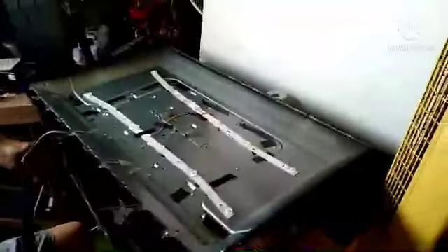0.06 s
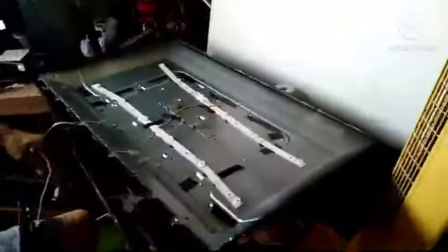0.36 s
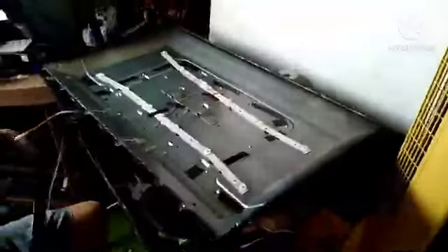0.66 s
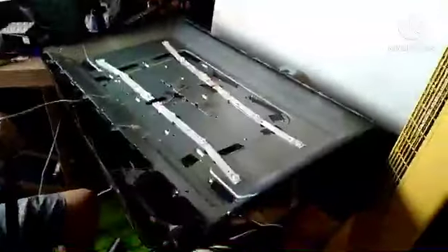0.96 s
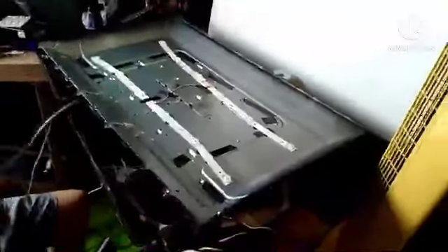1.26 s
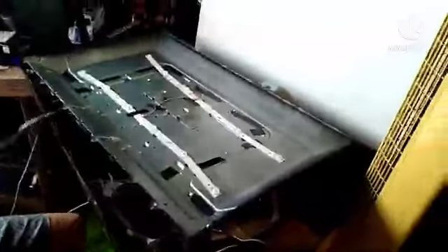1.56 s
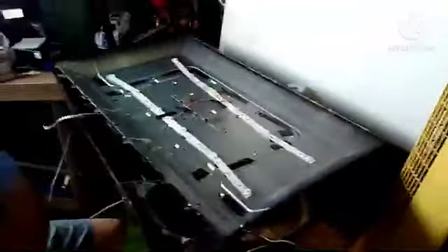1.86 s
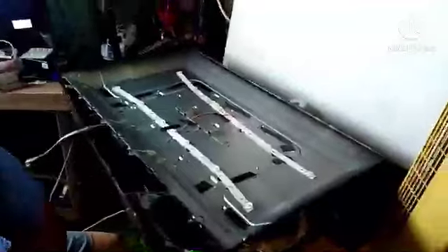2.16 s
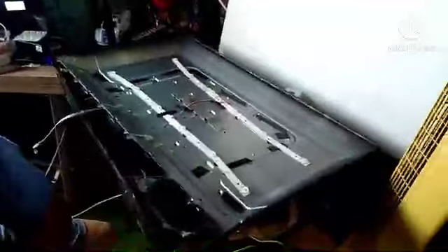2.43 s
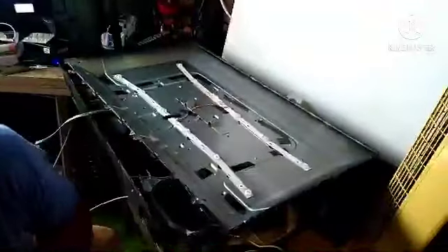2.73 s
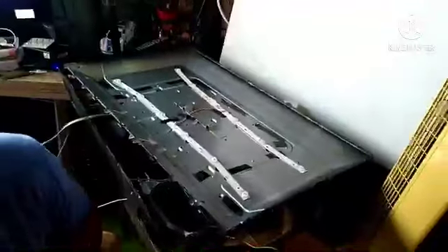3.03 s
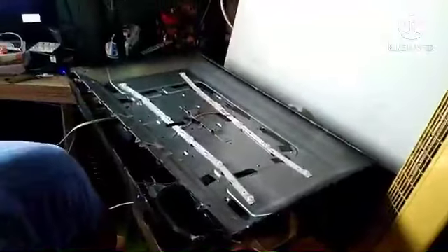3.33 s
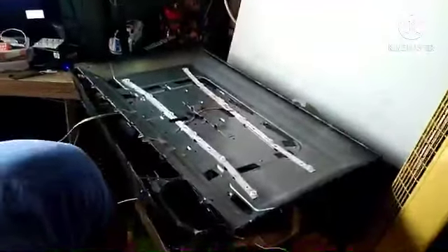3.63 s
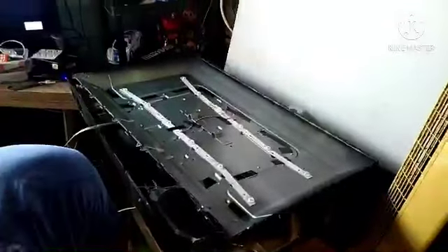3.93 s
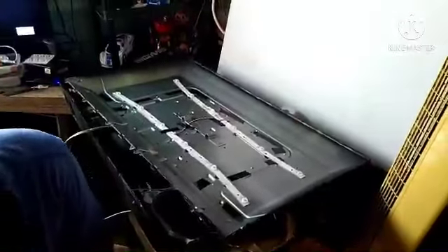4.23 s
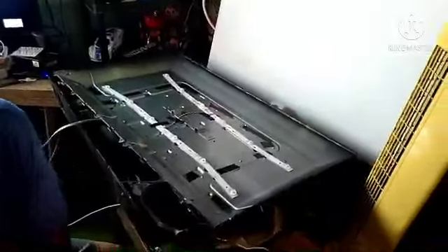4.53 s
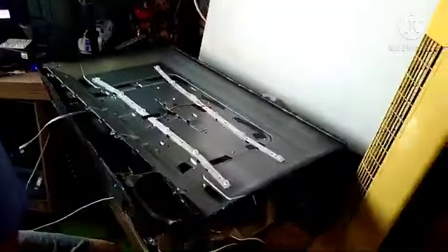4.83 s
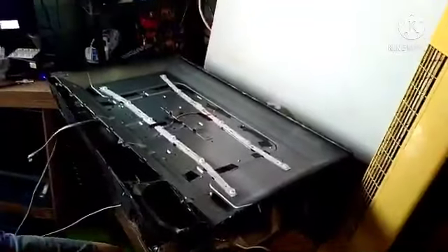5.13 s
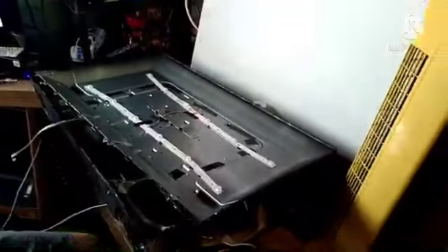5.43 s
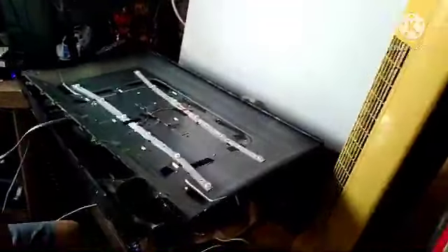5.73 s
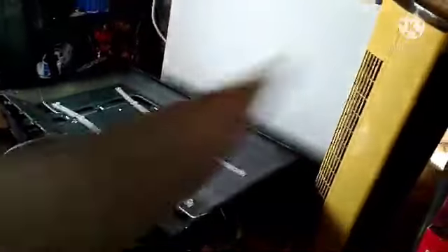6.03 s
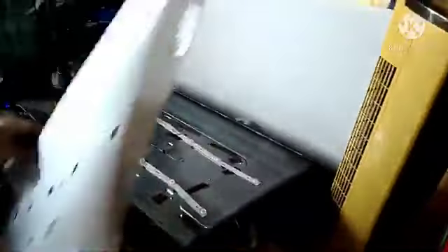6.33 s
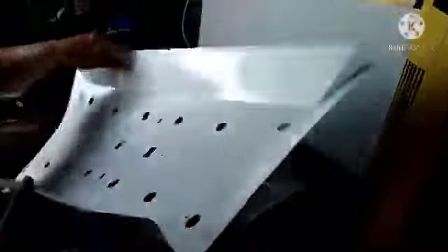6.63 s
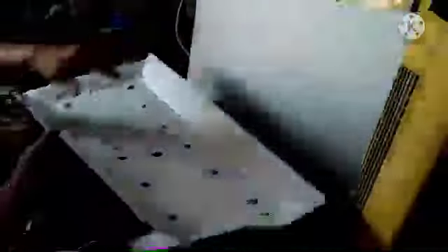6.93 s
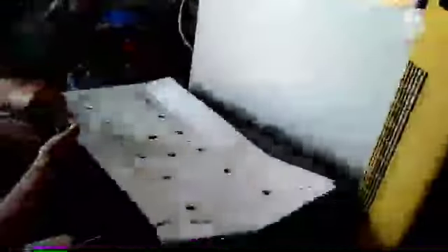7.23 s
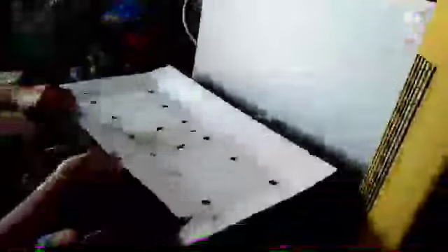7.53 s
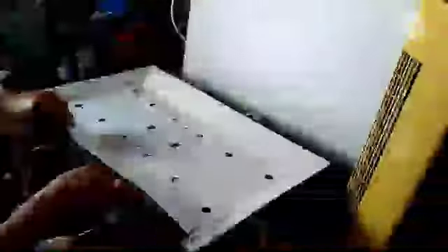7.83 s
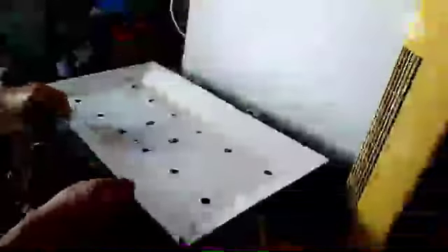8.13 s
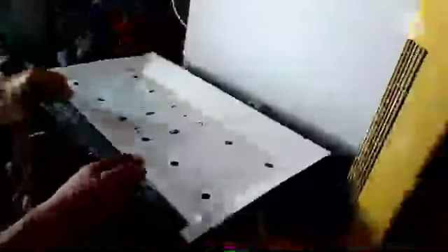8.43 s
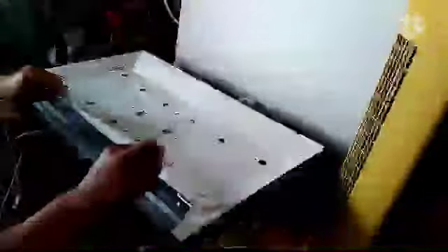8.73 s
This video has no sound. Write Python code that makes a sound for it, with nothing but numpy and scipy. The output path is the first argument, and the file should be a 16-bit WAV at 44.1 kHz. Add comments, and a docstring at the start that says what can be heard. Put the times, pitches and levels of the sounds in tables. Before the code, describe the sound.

Over a faint hiss in a small workshop, fingers fiddle with loose parts on a metal tray: tiny ticks, faint brushing and light clicks, with a sharp knock at 2 seconds. From about 3.6 seconds a thin plastic sheet is dragged out with uneven, hollow rubbing, giving a few snaps around 4.5 and 5.1 seconds. Near 5.6 seconds it buckles with the loudest snaps, then crackles, rustles and flaps softly as it swings, until about 6.8 seconds, with one very brief high squeak near 6.1 seconds. From 6.8 seconds to the end, near 9 seconds, its edge scrapes along the tray in short, quieter shoves, catching and letting go with small clicks. The room answers each contact with a short echo, and the quiet sounds are thinned, as if by noise reduction.

```python
"""A thin plastic sheet is picked up, swung over an open metal panel tray and slid into place.
First, fingers fiddle with loose parts: light clicks, a knock at 2 s. From 3.6 s the sheet is dragged
out in stick-slip. Near 5.6 s it buckles with loud snaps, then crackles, flaps and squeaks once as it
swings. From 6.8 s its edge scrapes and catches along the tray in short shoves. Throughout, the small
workshop answers shortly and a noise suppressor thins the quiet sounds."""
import sys
import numpy as np
from scipy import signal
from scipy.fft import rfft, irfft, next_fast_len
from scipy.io import wavfile
from scipy.ndimage import uniform_filter1d, map_coordinates

SR = 44100
rng = np.random.default_rng(int(sys.argv[2]) if len(sys.argv) > 2 else 0)


def file_out(sig):
    """Save sig as 16-bit WAV at sys.argv[1]."""
    # one column per channel
    cols = np.atleast_2d(sig).T
    # limit, then scale
    lim = np.clip(cols, -1, 1)
    pcm = np.round(lim * 32767).astype(np.int16)
    wavfile.write(sys.argv[1], SR, pcm)


N = 391608

# Workshop decay: freq_hz, t60_s
ROOM_DECAY = [(100, 0.81), (260, 0.61), (700, 0.23), (1800, 0.23), (4800, 0.24), (12800, 0.24)]
# Spectra of background, moved air, friction and blows: freq_hz, density_db
HISS_SPECTRUM = [(20, 0), (58, 13), (90, -3), (125, 11), (170, -1.5), (380, 3.5), (700, -6.5), (1200, 2.5),
                 (2700, -0.5), (4200, -22), (8500, -18), (9700, -5.5), (11000, -12), (15500, -36.5)]
FLAP_SPECTRUM = [(40, -29), (85, -9), (125, -1), (200, 5), (300, 3.5), (500, -10.5), (1000, -59)]
SCRAPE_SPECTRUM = [(350, -88.5), (700, -23), (1000, -10.5), (1400, 0.5), (1800, -3), (2200, 2.5),
                   (2650, 4.5), (3200, -3), (4000, -10.5), (5200, -29.5), (9000, -62.5)]
HOLLOW_SPECTRUM = [(60, -45.5), (130, -25), (250, -7.5), (400, 6), (550, 7), (750, 5.5), (1100, 1.5),
                   (2000, -51)]
FIZZ_SPECTRUM = [(2500, -10.5), (4300, -5), (5700, -2.5), (7500, 2.5), (9200, 2.5), (11000, -6),
                 (15500, -13)]
CLACK_SPECTRUM = [(250, -57), (550, -23), (950, -2), (1350, -0.5), (1800, -1.5), (2700, 0), (3500, -11.5),
                  (4600, -22.5), (6500, -49.5), (10000, -79)]
CRACK_SPECTRUM = [(1500, -49.5), (3000, 9), (4000, 4), (5700, -7), (7800, 0.5), (10500, -6), (13000, -16),
                  (15500, -13.5)]
THUMP_SPECTRUM = [(50, -61.5), (100, -20), (135, -17), (185, 0.5), (260, -5.5), (480, -1), (700, 3),
                  (1100, -19), (2000, -70.5)]
# Scrape of the sheet lying flat, re its edge: freq_hz, gain_db
FLAT_FILTER = [(700, -6), (1100, 13.5), (1800, 7), (2600, -14), (4000, -3)]
# Resonances of a brushed metal part and of a light touch: centre_hz, width_hz, gain_db
BRUSH_PEAKS = [(4540, 310, 1), (5900, 270, -5), (7500, 2000, -14)]
TOUCH_PEAKS = [(1412, 144, -2), (2588, 113, -4)]
# Thin hiss near 9 kHz in quiet rubbing, as the noise suppressor leaves it: centre_hz, width_hz, gain_db
THIN_HISS_BANDS = [(9300, 640, 4.5), (11500, 4000, -16), (14800, 1800, -19)]
# High and low modes of the struck sheet and tray: freq_hz, gain_db, base_t60_s
RING_MODES = [(945, -15, 0.26), (983, -4, 0.21), (1317, 13.5, 0.27), (1485, -1, 0.4), (1496, 8.5, 0.19),
              (2210, -18, 0.31), (2210, -9, 0.23), (2410, 10, 0.19), (2564, 2, 0.1), (3576, -18, 0.2)]
BODY_MODES = [(183, -2, .2), (245, -3, .15), (285, 0, .26), (470, -4, .1), (790, 0, .18)]

# Soft bumps, groans and faint squeaks of shifted things: centre_s, pitch_hz, level_db
SOFT_BUMPS = [(0.373, 1023, -64), (.405, 2705, -59.5), (.59, 2860, -61.5), (.735, 415, -66.5),
              (1.069, 2623, -61.5), (1.391, 1340, -52), (1.524, 1085, -51), (1.563, 457, -59),
              (1.733, 1118, -54), (1.455, 2160, -57.5), (2.794, 1342, -57.5), (2.529, 2600, -58),
              (2.79, 2640, -56), (3.324, 256, -57), (3.631, 604, -53.5), (3.704, 537, -51.5),
              (3.776, 550, -50.5), (3.873, 621, -46.5), (3.92, 540, -44.5), (3.99, 558, -38),
              (4.901, 388, -56), (5.11, 384, -45), (5.197, 334, -55), (6.805, 300, -56), (7.7, 721, -50.5),
              (8.361, 420, -54.5), (8.711, 248, -54.5)]
# A metal part is brushed: start_s, gain_db
BRUSH_STROKES = [(.458, -54.5), (1.23, -75.5), (2.33, -63.5), (2.82, -60.5)]
# The swinging sheet flaps: time_s, level_db
FLAP_LEVELS = [(5.6, -87), (5.8, -51), (6.1, -49), (6.3, -55.5), (6.5, -55.5), (6.8, -67.5), (7.3, -65),
               (7.6, -88)]
# Fingers fiddle with the parts: time_s, scrape_db
FIDDLE_LEVELS = [(0, -86), (.4, -67.5), (.9, -77), (1.6, -59.5), (2.4, -68), (2.6, -65), (3.5, -64),
                 (5.3, -59), (5.45, -72.5), (7, -59), (8.8, -56.5)]
# The sheet is dragged out, then swung: time_s, scrape_db, hollow_db, fizz_db
DRAG_LEVELS = [(3.6, -77, -68.5, -68), (3.622, -62, -56.5, -77), (3.69, -62.5, -66, -87),
               (3.974, -47, -48, -64.5), (3.99, -36, -34.5, -63), (4.094, -46, -48.5, -58.5),
               (4.132, -39, -33, -63.5), (4.242, -43.5, -48.5, -58), (4.288, -36.5, -40.5, -53),
               (4.39, -39, -47.5, -57), (4.468, -28, -32, -57), (4.52, -44, -42, -76),
               (4.532, -39, -33.5, -62), (4.562, -44.5, -40.5, -68), (4.632, -46, -52.5, -65.5),
               (4.76, -55, -58, -79)]
SWING_LEVELS = [(5.8, -39, -49, -70), (5.87, -36, -39.5, -73), (6.016, -42, -45, -64.5),
                (6.066, -45.5, -46, -63), (6.176, -34.5, -41.5, -65), (6.248, -48.5, -54.5, -59.5),
                (6.412, -46, -70, -70), (6.57, -47, -55, -61), (6.74, -55.5, -67, -68),
                (6.914, -44.5, -56, -81.5), (7.08, -71, -68, -81)]
# Offsets on those two moves: scrape_db, hollow_db, fizz_db
DRAG_OFFSETS = [-2.5, -0.5, 0.5]
SWING_OFFSETS = [-4, 1.5, -2]
# Shoves along the tray: start_s, length_s, scrape_db, hollow_re_scrape_db, fizz_re_scrape_db
TRAY_SHOVES = [(1.458, 0.092, -52.5, -31, -17), (1.728, 0.065, -61.5, -2.5, -7),
               (2.1, 0.18, -54, -9.5, -15), (2.758, 0.08, -61, -36, -32), (2.97, 0.14, -62, -22, -14.5),
               (5.088, 0.27, -63, -1, -37.5), (6.35, 0.11, -53, 2, -14), (6.76, 0.18, -59, 10.5, -19),
               (6.888, 0.025, -41, -21, -19.5), (7.108, 0.031, -41.5, -6.5, -13),
               (7.186, 0.052, -32, -11.5, -19.5), (7.239, 0.074, -38, -6.5, -20),
               (7.328, 0.29, -45, -12.5, -13.5), (7.398, 0.028, -40, -16, -21),
               (7.668, 0.036, -44.5, -6, -10.5), (7.753, 0.081, -39.5, -7.5, -19.5),
               (7.858, 0.072, -48, -13, -15), (7.978, 0.091, -55, -18, -15.5), (8.09, 0.061, -47, -35, -17),
               (8.278, 0.16, -49, -32.5, -13), (8.468, 0.11, -50, -12.5, -18),
               (8.688, 0.064, -45, -9.5, -32), (8.818, 0.041, -38, -24, -19)]
# Loose parts click on the tray: start_s, clack_db, brightness_hz, crack_db
PART_CLICKS = [(1.065, -56, 2620, -74), (1.38, -42.5, 1380, -63), (1.3998, -56, 1400, -54),
               (1.4428, -36, 1370, -52.5), (1.5064, -43.5, 1120, -55), (1.7092, -37, 2130, -63),
               (1.7324, -40, 2800, -57), (1.9971, -24.5, 1600, -44.5), (2.2208, -42, 2340, -64),
               (2.741, -52, 2580, -71.5), (3.7683, -38.5, 710, -57.5), (3.8549, -30.5, 920, -50),
               (4.8, -39.5, 2400, -56.5), (4.878, -41, 2580, -71), (4.919, -37.5, 2800, -59.5)]
# Dull knocks on the tray: start_s, clack_db, brightness_hz, thump_db
TRAY_KNOCKS = [(1.1355, -42, 550, -44.5), (1.152, -41.5, 550, -52), (2.0383, -12, 950, -30),
               (2.0564, -39.5, 720, -45), (2.1942, -29.5, 740, -42), (3.6203, -42.5, 590, -56.5),
               (4.6038, -49, 680, -44), (4.7239, -36.5, 1060, -49.5), (5.0866, -23.5, 1900, -41.5),
               (6.3257, -29.5, 1340, -40.5)]
# Tiny bright ticks: start_s, crack_db
BRIGHT_TICKS = [(.192, -44), (0.215, -53), (0.2377, -53), (.378, -63), (.96, -70), (1.9, -63.5),
                (6.6676, -51), (8.1597, -55), (8.285, -55.5), (8.317, -69), (8.8235, -42)]
# The sliding edge catches and lets go: start_s, clack_db
EDGE_CATCHES = [(3.909, -27), (6.906, -27.5), (7.1212, -30.5), (7.1836, -24.5), (7.195, -21.5),
                (7.414, -25.5), (7.5614, -30), (7.6773, -31), (7.7316, -25.5), (7.8039, -29),
                (8.0746, -32.5), (8.3977, -31.5), (8.5112, -32), (8.6846, -32), (8.8212, -25)]
# The sheet buckles or slaps the tray: start_s, clack_db, brightness_hz, crack_db, clack_t60_s
SHEET_SNAPS = [(3.9894, -25, 1370, -53, 0.1), (4.4297, -19, 1480, -50, 0.13), (4.468, -15, 1220, -67, 0.11),
               (4.53, -18, 1500, -53, .09), (5.0983, -19, 940, -44, 0.05),
               (5.1541, -18.5, 1190, -47.5, 0.073), (5.222, -30, 1540, -61, 0.059),
               (5.2385, -26.5, 1130, -66.5, 0.086), (5.5484, -4, 1510, -31.5, 0.12),
               (5.6123, -3, 1130, -21.5, .18), (5.6428, -11, 1270, -51, 0.083),
               (5.6673, -16, 1220, -44, .065), (5.7781, -15.5, 1380, -48.5, 0.11),
               (5.8045, -11.5, 970, -35, 0.069), (5.8763, -14, 2280, -38.5, 0.14),
               (5.947, -13.5, 1920, -44.5, 0.12), (6.0196, -24, 1330, -39.5, 0.18),
               (6.061, -16.5, 2350, -59, .05), (6.092, -16, 1220, -48.5, 0.057),
               (6.1713, -18.5, 1310, -49.5, 0.13), (6.4317, -11, 1400, -49, 0.074),
               (6.5262, -16.5, 1350, -61.5, .1), (6.742, -25, 1250, -58, 0.062)]


def amp(db):
    return 10 ** (np.asarray(db) / 20)


def unit_rms(x):
    return x / np.sqrt(np.mean(x ** 2) + 1e-20)


def log_interp(points, hz):
    """Curve through (freq_hz, value) points on a log axis."""
    knots_hz, values = np.transpose(points)
    return np.interp(np.log(hz + 1), np.log(knots_hz + 1), values)


def fade(t, t60_s):
    """Exponential decay, 60 dB in t60_s."""
    return np.exp(-np.log(1000) * t / np.maximum(t60_s, 1e-3))


def wobble(knots_per_s):
    """Smooth random curve."""
    knots = rng.standard_normal(int(N * knots_per_s / SR) + 4)
    return map_coordinates(knots, [np.arange(N) * knots_per_s / SR])


def add(track, start_s, sound):
    part = track[round(start_s * SR):][:len(sound)]
    part += sound[:len(part)]


def filtered(x, response):
    """x through a gain given as a function of Hz."""
    size = next_fast_len(len(x) + 4096)
    return irfft(rfft(x, size) * response(np.fft.rfftfreq(size, 1 / SR)), size)[:len(x)]


def coloured(x, spectrum):
    """x shaped by a spectrum, at rms 1."""
    return unit_rms(filtered(x, lambda hz: amp(log_interp(spectrum, hz))))


def bandpassed(x, bands):
    """x through steep-sided bands, at rms 1."""
    def response(hz):
        return sum(amp(db) * (1j * hz * width_hz / (centre_hz ** 2 - hz ** 2 + 1j * hz * width_hz)) ** 2
                   for centre_hz, width_hz, db in bands)
    return unit_rms(filtered(x, response))


def hiss(level_db=-66):
    """Faint steady background."""
    return amp(level_db) * coloured(rng.standard_normal(N), HISS_SPECTRUM)


def room(x, rise_s=0.0011, segments=24):
    """Workshop reverb; crossfaded tails change its fine pattern as the sheet moves about."""
    out, hop = np.zeros(N), N / segments
    for k in range(segments + 1):
        hz, t, noise = signal.stft(rng.standard_normal(SR // 2), SR, nperseg=256)
        decay = fade(t, log_interp(ROOM_DECAY, hz)[:, None])
        tail = signal.istft(noise * decay, SR, nperseg=256)[1]
        tail *= 1 - np.exp(-(np.arange(len(tail)) / SR / rise_s) ** 2)
        span = np.arange(max(0, int((k - 1) * hop)), min(N, int((k + 1) * hop)))
        piece = x[span] * np.cos(np.pi / 2 * (span / hop - k))
        add(out, span[0] / SR, signal.fftconvolve(piece, tail / np.linalg.norm(tail)))
    return out


def brushes(rise_s=0.015, t60_s=0.34):
    """A small metal part is brushed: thin hiss that swells and rings out."""
    out, t = np.zeros(N), np.arange(SR // 2) / SR
    envelope = (1 - np.exp(-t / rise_s)) ** 2 * fade(t, t60_s)
    for start_s, db in BRUSH_STROKES:
        add(out, start_s, amp(db) * envelope * bandpassed(rng.standard_normal(len(t)), BRUSH_PEAKS))
    return out


def bumps(waver_rad=1.15, half_width_s=0.018):
    """Soft contacts swell in one wavering resonance, without a click."""
    out, t = np.zeros(N), np.linspace(-0.25, 0.25, SR // 2)
    envelope = np.exp(-(t / half_width_s) ** 2)
    for centre_s, pitch_hz, db in SOFT_BUMPS:
        drift = map_coordinates(rng.standard_normal(64), [np.linspace(0, 63, len(t))])
        hum = np.sqrt(2) * np.sin(2 * np.pi * pitch_hz * t + waver_rad * drift)
        add(out, centre_s + t[0], amp(db) * hum * envelope)
    return out


def flaps(swing_db=1.7):
    """The bending sheet pushes air in uneven low flaps."""
    level_db = np.interp(np.arange(N) / SR, *np.transpose(FLAP_LEVELS), left=-120, right=-120)
    level_db += swing_db * wobble(knots_per_s=34)
    return amp(level_db) * coloured(rng.standard_normal(N), FLAP_SPECTRUM)


def rubbing_gains(fiddle_swing_db=2, attack_s=0.017, release_t60_s=0.23):
    """Scrape, hollow-body and fizz gains: fiddling, drag, swing and shoves add in power."""
    t = np.arange(N) / SR
    fiddle_db = np.interp(t, *np.transpose(FIDDLE_LEVELS)) + fiddle_swing_db * wobble(knots_per_s=22)
    power = np.outer(amp([0, -15, -15]), amp(fiddle_db)) ** 2
    for move, offsets_db in (DRAG_LEVELS, DRAG_OFFSETS), (SWING_LEVELS, SWING_OFFSETS):
        times_s, *curves_db = np.transpose(move)
        moving = (t > times_s[0]) & (t < times_s[-1])
        levels_db = [np.interp(t, times_s, curve) + db for curve, db in zip(curves_db, offsets_db)]
        power += moving * amp(levels_db) ** 2
    for start_s, length_s, db, hollow_db, fizz_db in TRAY_SHOVES:
        attack = np.clip((t - start_s) / attack_s, 0, 1)
        release = fade(np.clip(t - start_s - length_s, 0, 1), release_t60_s)
        power += np.outer(amp([db, db + hollow_db, db + fizz_db]), attack * release) ** 2
    return np.sqrt(power)


def stick_slip(slips_per_s, spread_db, smooth_db):
    """Tiny releases of uneven size on a bed of smooth friction."""
    slips = (rng.random(N) < slips_per_s / SR) * rng.choice([-1, 1], N)
    sizes = amp(spread_db * np.clip(rng.standard_normal(N), -2, 2))
    return unit_rms(slips * sizes) + amp(smooth_db) * rng.standard_normal(N)


def roaming(x, depth_db):
    """As the contact travels, mode groups come and go at steady total power."""
    bins = signal.stft(x, nperseg=1024)[2]
    field = rng.standard_normal(bins.shape)
    for _ in range(2):
        field = uniform_filter1d(uniform_filter1d(field, size=4, axis=0), size=5, axis=1)
    bins *= amp(depth_db * np.clip(unit_rms(field), -2, 2))
    power = uniform_filter1d(np.sum(np.abs(bins) ** 2, axis=0), size=3)
    bins /= np.sqrt(np.abs(power) + 1e-20)
    return unit_rms(signal.istft(bins, nperseg=1024)[1][:N])


def slide(flutter_db=2.07):
    """Slips along the edge drive the sheet's scrape, hollow body and fine fizz."""
    scrape_gain, hollow_gain, fizz_gain = rubbing_gains()
    friction = stick_slip(slips_per_s=600, spread_db=2.5, smooth_db=0.5)
    friction *= amp(flutter_db * wobble(knots_per_s=70))
    # A light touch sounds two resonances; pressure spreads the scrape over the band.
    lightness = np.interp(20 * np.log10(scrape_gain), [-66, -54, -38], [0.8, 0.25, 0.05])
    # A flatter sheet is hollower and scrapes duller.
    flatness = hollow_gain ** 2 / (hollow_gain ** 2 + scrape_gain ** 2)
    edge = coloured(friction, SCRAPE_SPECTRUM)
    broad = roaming((1 - flatness) * edge + flatness * coloured(edge, FLAT_FILTER), depth_db=3.5)
    narrow = roaming(bandpassed(friction, TOUCH_PEAKS), depth_db=10)
    scrape = amp(-0.5) * (np.sqrt(1 - lightness) * broad + np.sqrt(lightness) * narrow)
    hollow = amp(-3) * roaming(coloured(friction, HOLLOW_SPECTRUM), depth_db=3)
    broad_fizz = np.sqrt(1 - lightness) * coloured(friction / 2 + rng.standard_normal(N), FIZZ_SPECTRUM)
    thin_hiss = lightness * bandpassed(rng.standard_normal(N), THIN_HISS_BANDS)
    fizz = amp(-0.5) * roaming(broad_fizz + thin_hiss, depth_db=0.5)
    return scrape_gain * scrape + hollow_gain * hollow + fizz_gain * fizz


def edge_squeak(centre_s=6.1396, pitch_hz=2900, gain_db=-6, half_width_s=0.0015, rough_rad=0.95):
    """The edge slips once: a few milliseconds of squeak, then the sheet rings on."""
    t = np.arange(N) / SR - centre_s
    phase_rad = 2 * np.pi * pitch_hz * t + rough_rad * wobble(knots_per_s=1100)
    squeak = np.exp(-(t / half_width_s) ** 2) * np.sin(phase_rad)
    squeak = filtered(squeak, lambda hz: 1 / np.hypot(1, (hz / 3800) ** 6))  # the squeak stays below about 4 kHz
    ring = bandpassed(rng.standard_normal(N), [(2620, 930, 0)])
    ring *= (t > 0) * fade(np.abs(t), t60_s=0.086)
    return amp(gain_db) * (squeak + amp(-15) * ring)


def ringing(modes, t, scatter_db):
    """Decaying modes, struck at new strengths each time; starts at rms 1."""
    hz, db, t60_s = np.transpose(modes)[:, :, None]
    gains = amp(db + scatter_db * rng.standard_normal(hz.shape))
    waves = np.sin(2 * np.pi * (hz * t + rng.random(hz.shape))) * fade(t, t60_s)
    return (gains * waves).sum(0) / np.sqrt(np.sum(gains ** 2) / 2)


def crowded_modes(spectrum, depth_db, samples, spacing_hz):
    """Dense modes as noise of rms 1; a blow at one spot feeds some groups and misses others."""
    hz = np.fft.rfftfreq(samples, 1 / SR)
    groups = np.interp(hz / spacing_hz, np.arange(400), np.clip(rng.standard_normal(400), -2, 1.5))
    gains = amp(log_interp(spectrum, hz) + depth_db * groups)
    return unit_rms(irfft(rfft(rng.standard_normal(samples)) * gains, samples))


def blow(clack_db, brightness_hz, thump_db, crack_db, clack_t60_s):
    """One contact: brief crack, clack of sheet modes, ring, slower thump. Levels are before the mix."""
    t = np.arange(SR // 2) / SR
    # Small stiff buckles favour high modes, broad soft ones low modes.
    tilt_db_per_oct = 7 * np.log2(brightness_hz / 1750)
    spectrum = [(hz, db + tilt_db_per_oct * np.log2(hz / brightness_hz)) for hz, db in CLACK_SPECTRUM]
    depth_db = np.interp(clack_db, [-40, -12], [7, 3])  # harder blows wake the modes more evenly
    clack = crowded_modes(spectrum, depth_db, len(t), spacing_hz=170) * fade(t, clack_t60_s)
    ring = ringing(RING_MODES, t, scatter_db=3) * fade(t, 2.4 * clack_t60_s)
    crack = crowded_modes(CRACK_SPECTRUM, depth_db / 2, len(t), spacing_hz=287)
    crack *= fade(t, t60_s=0.03) + amp(-6.5) * fade(t, t60_s=0.091)
    crack *= 1 - np.exp(-t / 0.00055)
    thump = crowded_modes(THUMP_SPECTRUM, depth_db, len(t), spacing_hz=79.2) * fade(t, t60_s=0.17)
    thump += amp(-7) * ringing(BODY_MODES, t, scatter_db=4.5) * fade(t, t60_s=1)
    thump *= (1 - np.exp(-t / 0.0018)) ** 2  # the whole sheet takes a moment to move
    return (amp(clack_db - 11.5) * (clack + amp(-10.5) * ring)
            + amp(thump_db - 3.5) * thump
            + amp(crack_db + 1.5) * crack)


def taps():
    """Clicks, knocks, ticks and catches, each with its own balance of clack, thump and crack."""
    out = np.zeros(N)
    for start_s, db, brightness_hz, crack_db in PART_CLICKS:
        click = blow(db, brightness_hz, thump_db=db - 30.5, crack_db=crack_db, clack_t60_s=0.18)
        add(out, start_s, click)
    for start_s, db, brightness_hz, thump_db in TRAY_KNOCKS:
        knock = blow(db, brightness_hz, thump_db, crack_db=db - 29, clack_t60_s=0.091)
        add(out, start_s, knock)
    for start_s, db in BRIGHT_TICKS:
        tick = blow(db - 3, brightness_hz=3300, thump_db=db - 30.5, crack_db=db, clack_t60_s=0.28)
        add(out, start_s, tick)
    for start_s, db in EDGE_CATCHES:
        catch = blow(db, brightness_hz=2700, thump_db=db - 35, crack_db=db - 24.5, clack_t60_s=0.19)
        add(out, start_s, catch)
    return out


def snaps(thump_offset_db=-20, thump_db_per_db=1.21):
    """The harder the sheet buckles, the more of it moves and thumps."""
    out = np.zeros(N)
    for start_s, clack_db, brightness_hz, crack_db, clack_t60_s in SHEET_SNAPS:
        thump_db = thump_offset_db + thump_db_per_db * clack_db
        add(out, start_s, blow(clack_db, brightness_hz, thump_db, crack_db, clack_t60_s))
    return out


def scene():
    """Contacts, rubbing and squeak in the workshop, over hiss; mono."""
    contacts = snaps() + taps() + brushes() + bumps()
    rubbing = slide() + flaps()
    squeak = edge_squeak()
    reverb = room(amp(-6) * contacts + amp(-11.5) * rubbing + amp(-23) * squeak)
    return (contacts + rubbing + squeak + reverb + hiss())[None]


def suppressor(x, threshold_db=13, depth_db=-9):
    """Turns down each patch of sound that does not stand clear of its band's quiet level."""
    bins = signal.stft(x, nperseg=512)[2]
    power = uniform_filter1d(np.abs(bins) ** 2, size=2, axis=0)
    level = np.sqrt(np.abs(uniform_filter1d(power, size=5, axis=1)))
    quiet = uniform_filter1d(np.percentile(level, 10, axis=1), size=5)[:, None]
    clearance = (level / (quiet * amp(threshold_db) + 1e-12)) ** 4
    gain = (amp(depth_db) + clearance) / (1 + clearance)
    return signal.istft(bins * gain, nperseg=512)[1][:N]


def record(dry, ceiling=0.7, low_hz=80, top_hz=15700):
    """The recorder suppresses noise, rounds off peaks and loses deep bass and top treble."""
    x = suppressor(dry[0])
    x = x / (1 + (x / ceiling) ** 4) ** (1 / 4)
    x = filtered(x, lambda hz: hz ** 2 / np.hypot(hz ** 2, low_hz ** 2))
    return filtered(x, lambda hz: 1 / np.sqrt(1 + (hz / top_hz) ** 200))[None]


dry = scene()
out = record(dry)
file_out(out)
```